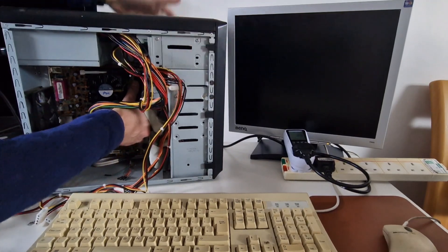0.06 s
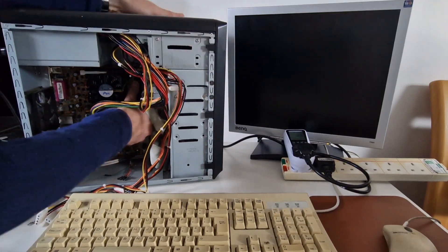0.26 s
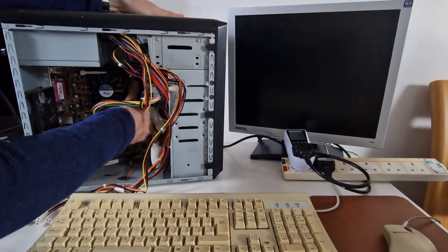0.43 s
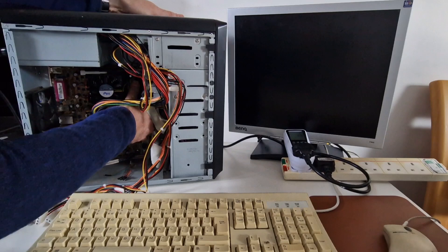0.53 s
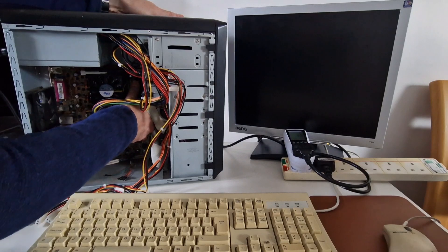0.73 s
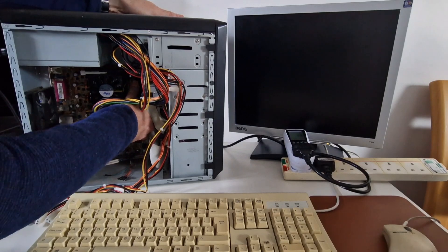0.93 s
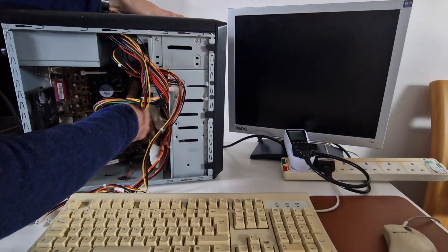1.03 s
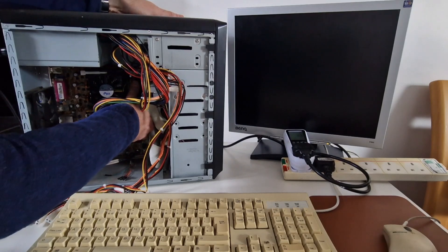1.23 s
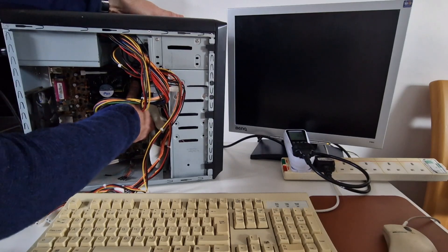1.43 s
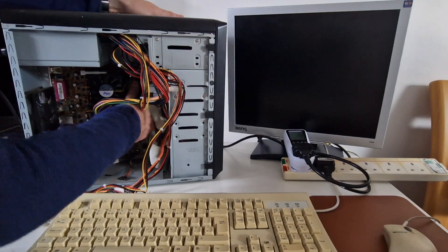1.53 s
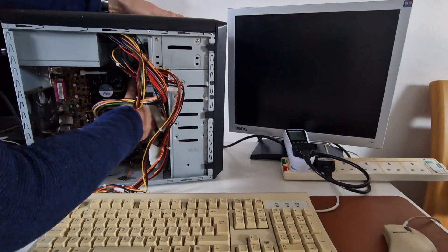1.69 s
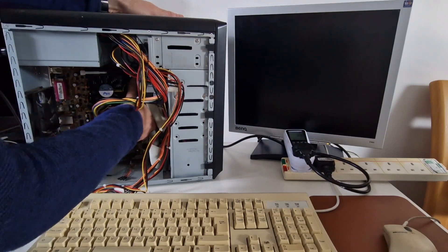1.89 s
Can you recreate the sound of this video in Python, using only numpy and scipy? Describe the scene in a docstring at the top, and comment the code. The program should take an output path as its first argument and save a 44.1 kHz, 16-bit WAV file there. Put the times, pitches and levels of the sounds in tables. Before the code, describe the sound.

A memory stick is pushed into a circuit board slot: a loud crunchy clunk with a hollow steel ring, small clicks, a second weaker knock, then soft hand and cable rustles, close stereo, small quiet room.

```python
"""Inside an open steel computer case on a desk in a small, quiet room, hands are at work. A memory stick grinds
into its slot twice (dense random slips); the board thumps (short cosines) and the case rings (decaying sines).
Around this, plastic clicks (filtered impulses), the latch and wires tick, cables rustle and a hand rubs, hand
and sleeve brush the chassis (slips again) and thin metal pings (short sines). Reflections are decaying noise
tails; the room floor is coloured noise."""
import sys
import numpy as np
from scipy import signal
from scipy.fft import rfft, irfft
from scipy.io import wavfile

SR = 44100
rng = np.random.default_rng(int(sys.argv[2]) if len(sys.argv) > 2 else 0)


def master(y):
    """Save y as 16-bit WAV."""
    cut = np.clip(np.atleast_2d(y).T, -1, 1)
    pcm = np.round(cut * 32767)  # scale
    wavfile.write(sys.argv[1], SR, pcm.astype(np.int16))


N = 85995
SEAT_LEFT_DB, CLICK_LEFT_DB, TICK_LEFT_DB = 0, 0.78, 2.5  # added on the left, taken off the right
LEAD_S = 0.0002


def amp(db):
    """Decibels to gain."""
    return 10 ** (np.asarray(db) / 20)


def read(points, hz):
    """Table joined by straight lines over log frequency."""
    f, value = np.transpose(points)
    return np.interp(np.log(hz + 1), np.log(f + 1), value)


def colour(x, points, size=4096):
    """Causal minimum-phase filter with the given (Hz, dB) spectrum."""
    hz = abs(np.fft.fftfreq(size, 1 / SR))
    log_gain = np.log(amp(read(points, hz)))
    taps = np.fft.ifft(np.exp(np.conj(signal.hilbert(log_gain)))).real
    return signal.oaconvolve(x, taps[:size // 2])[:N]


def brighten(x, treble_db):
    """Treble shelf: flat to the first corner, treble_db above the second."""
    from_hz, to_hz = 1600, 4500
    return colour(x, [(from_hz, 0), (to_hz, treble_db)], size=256)


def swell(peak_s, rise_s, fall_s):
    """Bell-shaped rise to a peak, then exponential fall."""
    t = np.arange(N) / SR - peak_s
    exponent = np.where(t < 0, (t / rise_s) ** 2, t / fall_s)
    return np.exp(-np.minimum(exponent, 20))


def grind(envelope):
    """Dense tiny slips of uneven size under an envelope, scaled to energy 1."""
    spread_db = 3
    count = N // 5
    sizes = amp(spread_db * rng.standard_normal(count))
    slips = np.zeros(N)
    slips[rng.integers(0, N, count)] = rng.choice([-1, 1], count) * sizes
    slips *= envelope
    return slips / np.sqrt(np.sum(slips ** 2) + 1e-20)


def place(x, left_db, lead_s=0):
    """Mono to stereo: level offset between the microphones, the right one late by lead_s."""
    i = np.arange(N)
    late = np.interp(i - lead_s * SR, i, x)
    return np.array([x * amp(left_db), late * amp(-left_db)])


def diffuse(pair):
    """Two unrelated channels become alike in the bass and stay unrelated in the treble."""
    wide_hz = 600  # middle of the gradual transition
    mid, side = rfft(pair)
    hz = np.fft.rfftfreq(pair.shape[1], 1 / SR)
    angle = np.pi / 4 * hz ** 2 / (hz ** 2 + wide_hz ** 2)
    common, difference = mid * np.cos(angle), side * np.sin(angle)
    return irfft([common + difference, common - difference], pair.shape[1])


def floor():
    """Faint steady rumble and hiss of the room: coloured stereo noise."""
    # spectrum before the overall gain: f/Hz, level/dB
    floor_colour = [(20, -40), (48, -32), (70, -40), (120, -37.5), (260, -43), (400, -50), (600, -54),
                    (1200, -59), (2500, -65.5), (5000, -70.5), (8000, -70), (10500, -79), (15500, -77)]
    level_db = -9
    noises = rng.standard_normal((2, N))
    return amp(level_db) * diffuse(np.array([colour(noise, floor_colour) for noise in noises]))


def reflections(x, t60, wet, onset_s):
    """Diffuse noise tail in which each band has its own level and decay."""
    noise = diffuse(rng.choice([-1., 1.], (2, SR)))
    hz, t, bands = signal.stft(noise, SR, nperseg=256)
    decay_s = read(t60, hz)[:, None] / np.log(1000)  # amplitude time constant
    bands = bands * np.exp(-t / decay_s) * np.sqrt(2 / (decay_s * SR))
    tail = signal.istft(bands, SR, nperseg=256)[1]
    tail_t = np.arange(tail.shape[1]) / SR
    tail = tail * (1 - np.exp(-(tail_t / onset_s) ** 2))
    return signal.fftconvolve(colour(x, wet)[None], tail, axes=1)[:, :N]


def pings():
    """Thin metal parts touched lightly: faint, short, high sines."""
    # light touches: t/s, level/dB, f/Hz, fall/s
    touches = [(1.695, -64.5, 3250, .006), (1.751, -69.5, 3200, 0.0088), (1.846, -67.5, 6880, 0.0086)]
    rise_s = 0.003
    t = np.arange(N) / SR
    rings = sum(amp(db) * swell(s, rise_s, fall_s) * np.sin(2 * np.pi * hz * (t - s))
                for s, db, hz, fall_s in touches)
    return place(rings, CLICK_LEFT_DB)


def brushes():
    """Dull, soft contact of hand and sleeve with the chassis: low-coloured slips."""
    # strokes: peak t/s, level/dB, rise/s, fall/s
    strokes = [(0.112, -13.5, 0.012, 0.016), (0.545, -13, .006, .02), (0.888, -20.5, .002, .02),
               (1.575, -12, .03, 0.04), (1.67, -9.5, 0.043, 0.049), (1.752, -12, 0.011, 0.011),
               (1.83, -10.5, .04, 0.064)]
    # spectrum: f/Hz, level/dB
    brush_colour = [(40, -6), (150, 0.5), (300, 4.5), (500, -0.5), (750, -5), (1100, -18.5), (2500, -30),
                    (6000, -38.5), (15000, -53)]
    slips = sum(amp(db) * grind(swell(s, rise_s, fall_s)) for s, db, rise_s, fall_s in strokes)
    return place(colour(slips, brush_colour), CLICK_LEFT_DB)


def rubs():
    """Cables and hands rubbing: soft rustles of slips, each with its own treble."""
    # rustles: peak t/s, level/dB, rise/s, fall/s, treble/dB
    rustles = [(0.0, -25.5, .01, 0.055, 2), (0.221, -5, 0.0048, .01, -4), (0.239, 2, 0.012, .004, 0.5),
               (0.325, -20.5, .02, 0.05, 18.5), (0.347, -8.5, 0.0014, .003, -4),
               (0.44, -31.5, 0.014, .02, 16), (0.631, -26.5, 0.076, 0.041, 6.5),
               (1.06, -33.5, .04, .05, -1.5), (1.203, -26, 0.0059, .003, 17.5),
               (1.715, -29.5, 0.027, 0.016, 11.5), (1.758, -32.5, 0.015, 0.024, 7.5),
               (1.844, -16, 0.0034, .012, -14), (1.866, -17.5, 0.013, 0.011, -14.5)]
    # spectrum shared by all: f/Hz, level/dB
    rub_colour = [(80, -15), (300, -2), (600, 0), (1300, -1.5), (2100, -3), (2800, -11), (4500, -19.5),
                  (7200, -18), (11000, -31.5), (15000, -37)]
    slips = sum(amp(db) * brighten(grind(swell(s, rise_s, fall_s)), treble_db)
                for s, db, rise_s, fall_s, treble_db in rustles)
    return place(colour(slips, rub_colour), CLICK_LEFT_DB)


def ticks():
    """Thin ticks of the latch and wires: short bright scratches made of slips."""
    # scratches: peak t/s, level/dB, fall/s
    scratches = [(0.2164, -4.5, .005), (0.2215, -1, .009), (0.5242, -9, 0.0034), (0.901, -28.5, 0.0029),
                 (1.2941, -15.5, 0.0032)]
    # spectrum: f/Hz, level/dB
    tick_colour = [(200, -36.5), (1200, -22.5), (2500, -14), (5000, -20.5), (7200, -12), (9500, -22.5),
                   (15000, -22)]
    rise_s = 0.00022
    slips = sum(amp(db) * grind(swell(s, rise_s, fall_s)) for s, db, fall_s in scratches)
    return place(colour(slips, tick_colour), TICK_LEFT_DB, LEAD_S)


def clicks():
    """Snaps of hard plastic with almost no ring: one filtered impulse each."""
    # snaps: t/s, level/dB, treble/dB
    snaps = [(0.0882, -3.5, 0), (0.5371, -17, -12), (0.6937, -14.5, -14.5), (0.7515, -35, -18),
             (1.5423, -5, -1.5), (1.6877, -24.5, -20), (1.81, -17.5, -19), (1.8736, -17, -17.5)]
    # spectrum: f/Hz, level/dB
    click_colour = [(50, -26.5), (140, -13), (300, -9), (480, 3.5), (750, 3.5), (1100, -4), (2000, -1.5),
                    (4100, -10), (5000, -22), (8000, -29.5), (10500, -52), (15000, -60)]
    hits = sum(amp(db) * brighten(signal.unit_impulse(N, round(s * SR)), treble_db)
               for s, db, treble_db in snaps)
    return place(colour(hits, click_colour), CLICK_LEFT_DB)


def thumps():
    """The board bends under the hand and swings back: cosines under short swells."""
    # board flexing: peak t/s, level/dB, f/Hz, rise/s, fall/s
    flexes = [(0.112, -46.5, 144.5, 0.0093, 0.014), (0.2272, -19, 127, .005, 0.013),
              (0.2442, -4, 262.4, 0.0038, .005), (0.2475, -15.5, 429.5, .007, 0.0042),
              (0.45, -52, 99.7, 0.023, .035), (0.541, -49.5, 620, 0.0027, .008),
              (0.7535, -58, 600, 0.0013, 0.0071), (0.891, -50, 231.8, .004, 0.025),
              (1.2143, -27, 255.3, 0.0062, 0.012), (1.245, -39.5, 120, .02, .022),
              (1.650, -48.5, 400, .003, 0.0048), (1.706, -37, 129, 0.0069, 0.0074),
              (1.752, -35.5, 150, 0.0028, 0.0036), (1.793, -39.5, 115, 0.0093, 0.0078),
              (1.858, -47, 152.7, 0.0095, 0.016)]
    t = np.arange(N) / SR
    swings = sum(amp(db) * swell(s, rise_s, fall_s) * np.cos(2 * np.pi * hz * (t - s))
                 for s, db, hz, rise_s, fall_s in flexes)
    return place(swings, SEAT_LEFT_DB, LEAD_S)


def seating():
    """The contacts grind into the slot and set the decaying modes of the steel case ringing."""
    # first and second push: peak t/s, level/dB, rise/s, fall/s
    pushes = [(0.2467, 1, .005, 0.018), (1.2108, -1, 0.0047, 0.0038)]
    # spectrum of each push: f/Hz, level/dB
    push_colours = [
        [(40, -3.5), (140, 23.5), (300, 22.5), (440, 25), (600, 20.5), (1150, 17), (2200, 11), (4500, 0.5),
         (7500, -1), (10000, -9.5), (15000, -10.5)],
        [(40, -16.5), (130, 18.5), (280, 18.5), (560, 8.5), (950, 16), (1300, 6), (2000, 4.5), (3500, -4.5),
         (4700, -2.5), (6600, -7), (7700, 1.5), (9500, -12.5), (15000, -18)],
    ]
    # case modes, relative to the ring level: f/Hz, level/dB, t60/s
    modes = [(97, -15, .45), (139.85, -3, .38), (186.7, 4, 0.38), (236, 0.5, .2), (264, 0.5, 0.18),
             (323, -3, .25), (388.4, -4.5, 0.33), (444, -2, .24), (589, -9, 0.17), (659, -7.5, .25),
             (800, -10.5, .2), (879, -6, .2), (1124, -8.5, .22), (1332, -12, .24)]
    # ring level for each push: level/dB
    ring_levels = [-32, -42.5]
    apart = 0.41  # energy share of the grinding that reaches each microphone by its own path
    out = np.zeros((2, N))
    for (s, db, rise_s, fall_s), points, ring_db in zip(pushes, push_colours, ring_levels):
        envelope = swell(s, rise_s, fall_s)
        direct, *scattered = [amp(db) * colour(grind(envelope), points) for _ in range(3)]
        t = np.maximum(np.arange(N) / SR - s, 0)
        ring = sum(amp(mode_db - 60 * t / t60) * np.sin(2 * np.pi * hz * t)
                   for hz, mode_db, t60 in modes)
        ring *= amp(ring_db) * (1 - np.exp(-t / rise_s))
        out += place(np.sqrt(1 - apart) * direct + ring, SEAT_LEFT_DB, LEAD_S)
        out += np.sqrt(apart) * diffuse(np.array(scattered))
    return out


def scene():
    """All handling sounds, echoed by the case walls and the room, over the room floor."""
    # decay of near, room and late reflections: f/Hz, t60/s
    near_t60 = [(100, 0.146), (1000, 0.0067), (10000, 0.12)]
    room_t60 = [(60, .5), (140, .36), (300, 0.25), (1000, 0.24), (3000, .24), (8000, .27), (13000, .25)]
    late_t60 = [(100, 1.0), (1000, 0.79), (10000, 0.53)]
    # their spectra: f/Hz, level/dB
    near_wet = [(100, -14), (300, -14), (700, -6), (2500, -8.5), (10000, -10.5)]
    room_wet = [(60, -10), (140, -6), (260, -9), (550, -5), (1200, -4), (3000, -6), (12000, -7.5)]
    late_wet = [(100, -23.5), (260, -34), (800, -26.5), (3000, -25.5), (12000, -25.5)]
    handling = pings() + brushes() + rubs() + ticks() + clicks() + thumps() + seating()
    source = handling[0]  # the left channel feeds all reflections
    near = reflections(source, near_t60, near_wet, onset_s=0.00059)
    room = reflections(source, room_t60, room_wet, onset_s=0.0055)
    late = reflections(source, late_t60, late_wet, onset_s=0.037)
    return floor() + late + room + near + handling


def record(dry):
    """The right microphone is a little duller; then a steep low-pass on both."""
    right_treble_db, edge_hz = -1.5, 15950
    pair = np.array([dry[0], brighten(dry[1], right_treble_db)])
    low_pass = signal.firwin(511, edge_hz, window=("kaiser", 9), fs=SR)
    return signal.oaconvolve(pair, low_pass[None], "same")


dry = scene()
out = record(dry)
master(out)
```